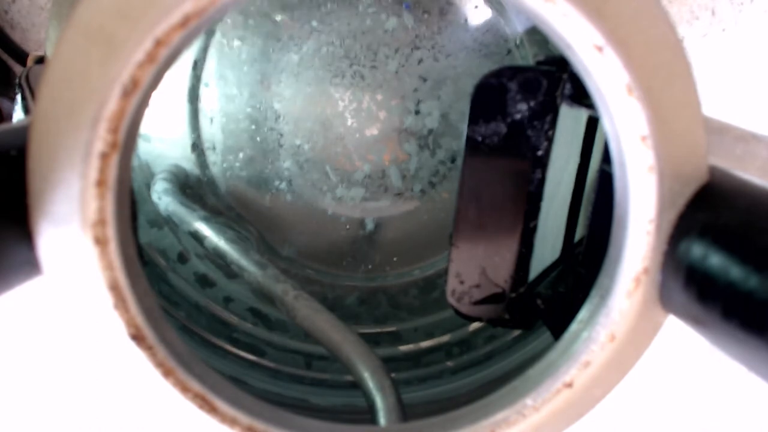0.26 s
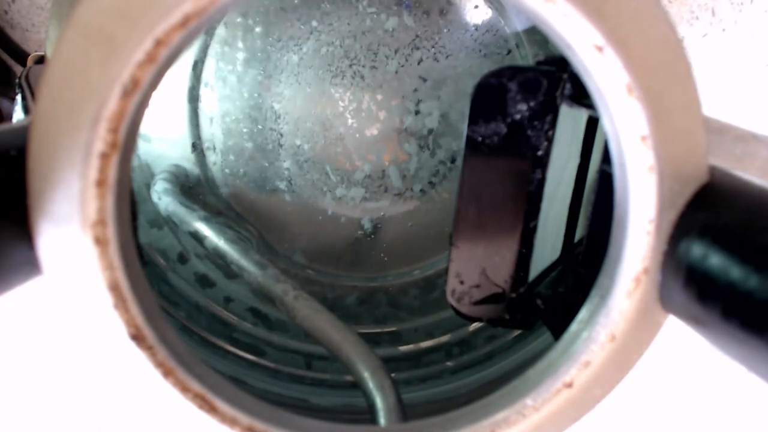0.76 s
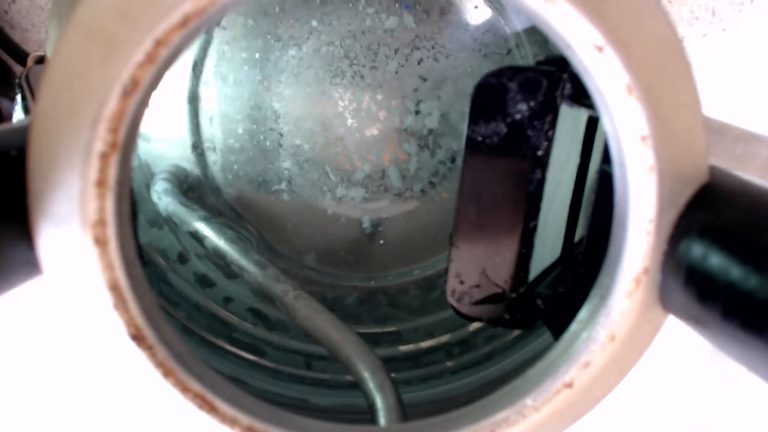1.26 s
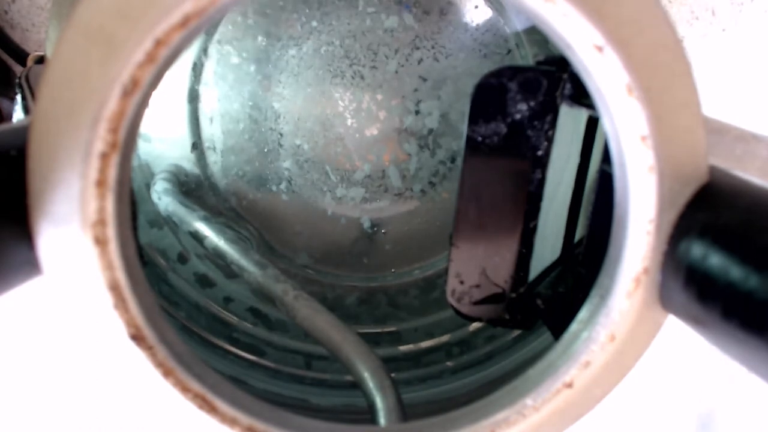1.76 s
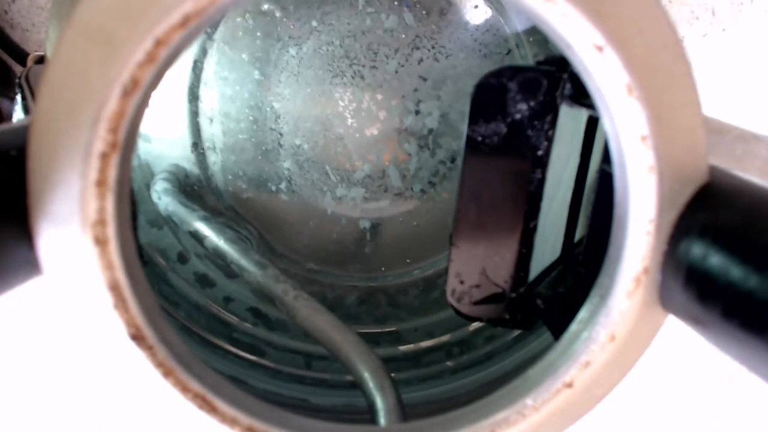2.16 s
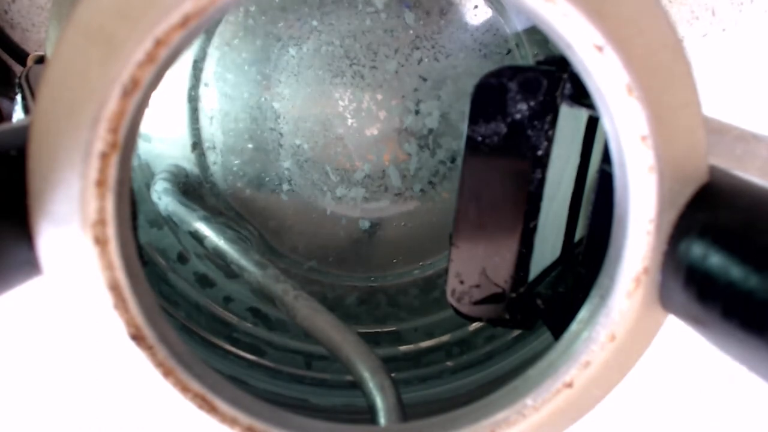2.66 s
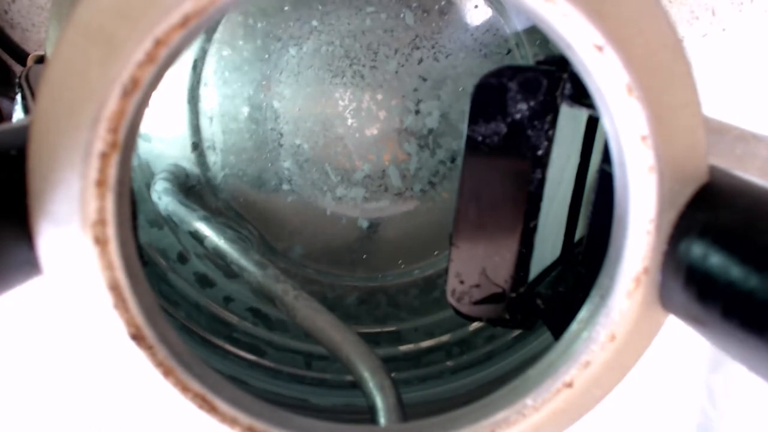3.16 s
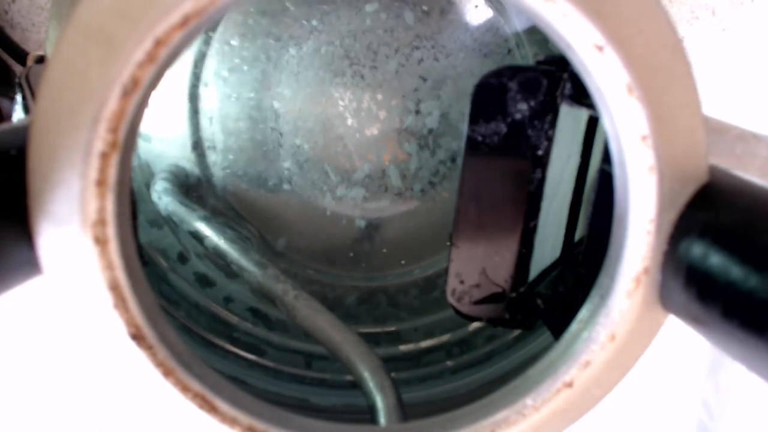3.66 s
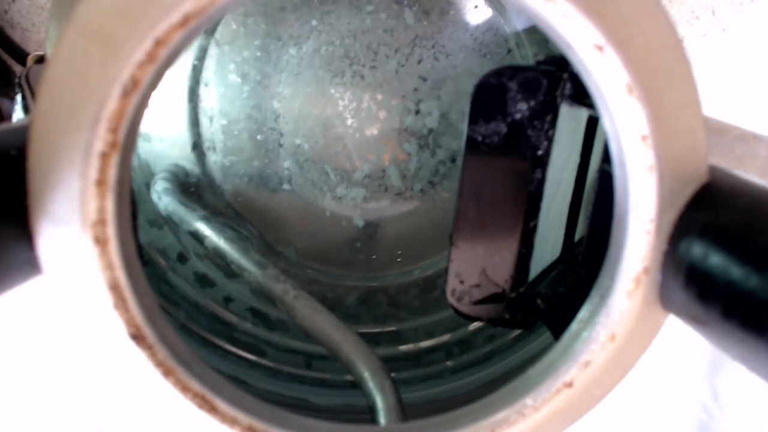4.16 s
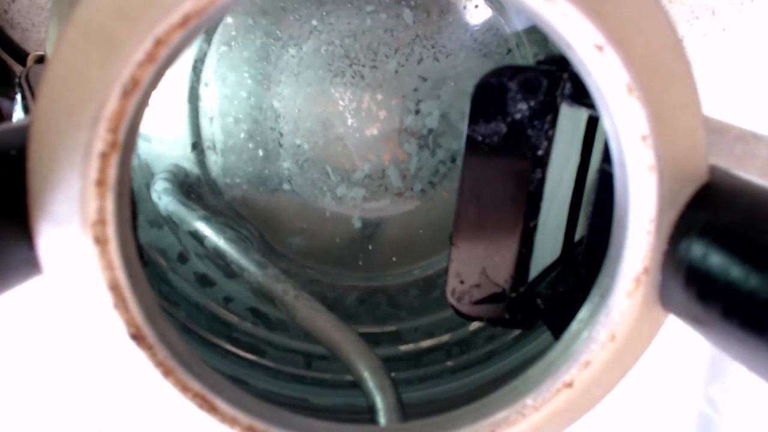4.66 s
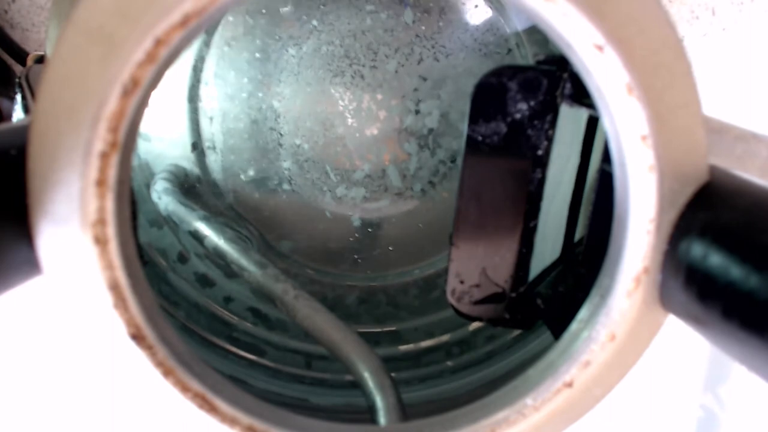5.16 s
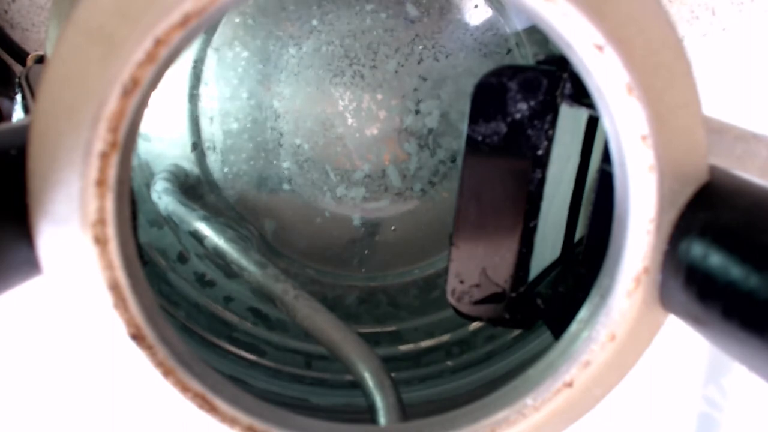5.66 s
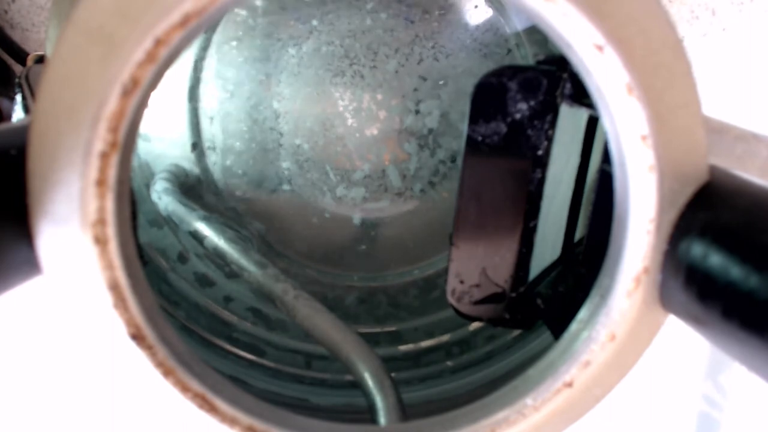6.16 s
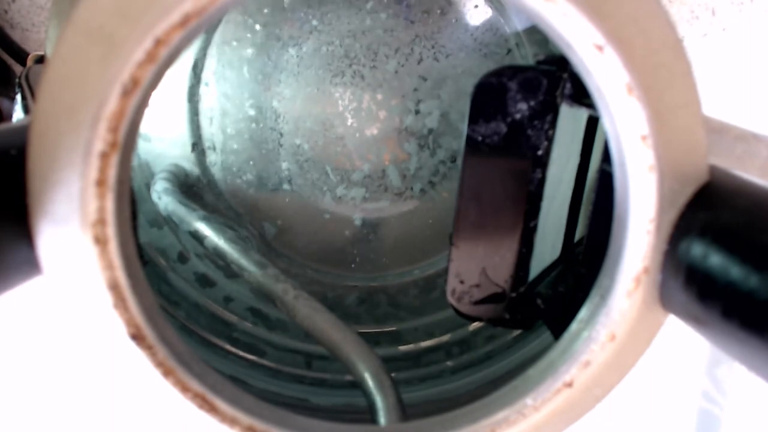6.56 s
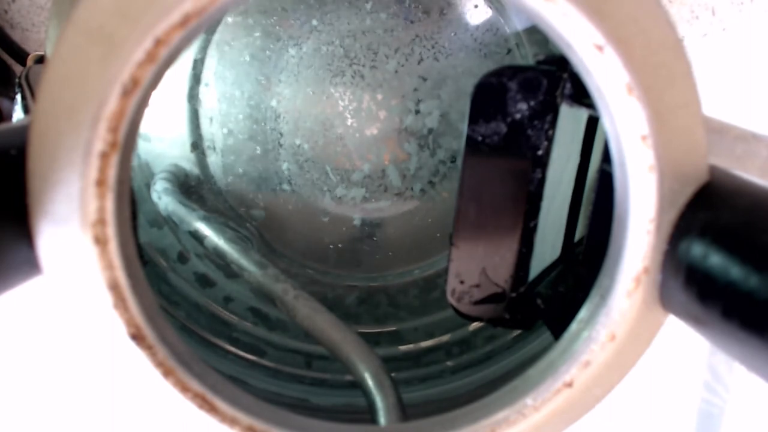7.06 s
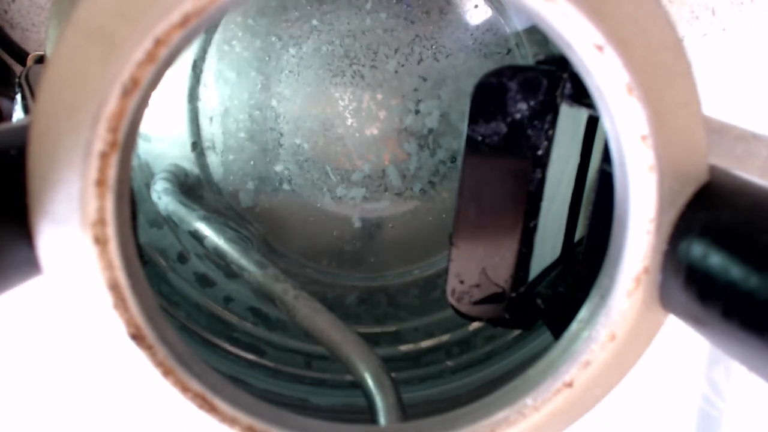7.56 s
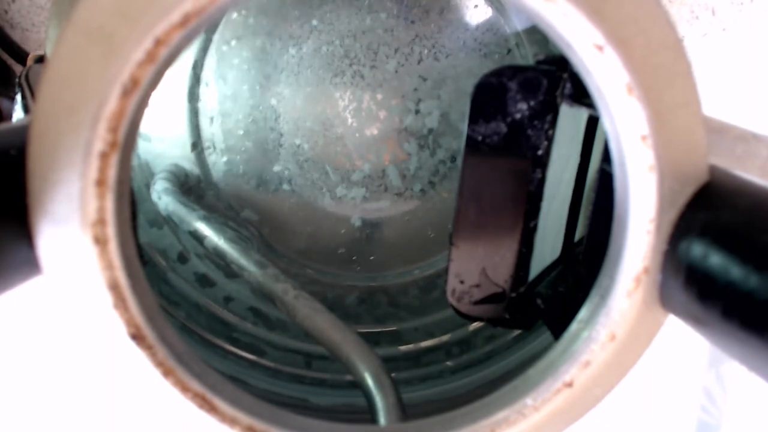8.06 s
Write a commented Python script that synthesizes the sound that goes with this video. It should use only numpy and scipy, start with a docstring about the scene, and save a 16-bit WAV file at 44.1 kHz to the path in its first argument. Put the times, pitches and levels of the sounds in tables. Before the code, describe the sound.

Water simmers in an electric kettle with its lid off, close to the microphone indoors. Quick, irregular blips and knocks ring briefly in the kettle's body, sometimes bunching together with a soft low thump. Smaller bubbles burble underneath and the tiniest merge into a steady sizzle, while a barely audible low hum and rumble sit beneath it all.

```python
"""Vapour bubbles swell and collapse on the element of an open electric kettle, heard just above the rim.
Each pulses for a few cycles and is loudest where the kettle resonates; the largest thump and heave.
Beneath them smaller bubbles simmer, and countless tiny collapses ring the upper modes as a steady fizz.
The worktop, shaken by the bubbling, rumbles faintly beside a low hum."""
import sys
import numpy as np
from scipy import signal
from scipy.fft import rfft, irfft, next_fast_len
from scipy.io import wavfile
from scipy.ndimage import uniform_filter1d, map_coordinates

SR = 44100
rng = np.random.default_rng(int(sys.argv[2]) if len(sys.argv) > 2 else 0)


def master(y):
    """Save y as 16-bit WAV."""
    cut = np.clip(np.atleast_2d(y).T, -1, 1)
    pcm = np.round(cut * 32767)  # scale
    wavfile.write(sys.argv[1], SR, pcm.astype(np.int16))


N = 367353

# spectrum of the worktop's rumble: (frequency [Hz], relative level [dB])
RUMBLE_SPECTRUM = [(15, -20), (65, -12), (97, -11), (150, 0.5), (200, -39), (330, -120)]
# spectrum of the fizz between the wall modes: (frequency [Hz], relative level [dB])
FIZZ_SPECTRUM = [(250, -60), (1400, -12), (1700, -14.5), (2200, -53), (4000, -26), (5200, -15.5),
                 (7000, -37), (9000, -28.5), (10500, -23.5), (11400, -33), (12100, -40)]
# upper modes of the wall: (frequency [Hz], bandwidth [Hz], gain [dB])
WALL_MODES = [(1860, 70, -11), (2140, 50, -3), (2320, 400, -4), (2365, 80, 0), (2890, 600, -5),
              (3210, 290, -5), (3520, 390, -6), (3820, 150, -6), (4170, 330, -8), (4560, 60, -5),
              (4600, 440, -9), (4655, 70, -7), (5040, 140, -14), (5460, 220, -12), (5680, 100, -13),
              (5840, 120, -17), (6030, 160, -17), (6410, 200, -11.5), (6850, 460, -17), (7210, 180, -21),
              (7480, 230, -16), (7830, 400, -20), (8390, 600, -20), (9410, 150, -19), (9610, 200, -23),
              (9980, 370, -25), (10490, 90, -30)]
# low modes of kettle and water: (frequency [Hz], bandwidth [Hz], gain [dB])
BODY_MODES = [(229, 62, -16.5), (306, 38, -2), (355, 41, -2), (458, 60, -4), (536.2, 21.3, -2),
              (618, 30, -10), (771, 36, -2), (852, 36, 2), (1006, 52, 1), (1220, 180, -14),
              (1329, 40.5, -6.5), (1462, 55, -9.5), (1566, 46, -20), (1626, 25, -14)]
# pushes of the hardest collapses on the whole kettle: (time [s], level [dB])
HEAVE_EVENTS = [(2.517, -52), (2.681, -55), (3.128, -54), (3.529, -44), (7.537, -50)]
# dull thumps of the largest collapses: (time [s], source level [dB])
THUMP_EVENTS = [(0.661, -38), (1.063, -42), (1.103, -31), (1.258, -33), (1.315, -39), (2.681, -33),
                (2.818, -38), (3.129, -37), (3.53, -41), (3.554, -35), (4.071, -41), (4.185, -43),
                (4.552, -40), (4.766, -32), (6.282, -32), (6.575, -37), (6.982, -35), (7.537, -42),
                (7.619, -43), (8.17, -36), (8.318, -40)]
# the clearest bubbles: (time [s], frequency [Hz], source level [dB], life [ms])
CLEAR_BUBBLES = [(0.127, 286, -14.5, 7.4), (0.232, 350, -20, 12), (0.236, 847, -18, 9.3),
                 (0.241, 1010, -23, 9.7), (0.306, 318, -17.5, 6), (0.321, 338, -21.5, 5.2),
                 (0.327, 510, -22, 9.5), (0.378, 830, -14.5, 6.1), (0.384, 1003, -12.5, 14),
                 (0.422, 806, -20, 5.6), (0.436, 352, -18.5, 6.6), (0.447, 836, -22, 9.8),
                 (0.5, 832, -11, 12.7), (0.503, 359, -18, 14), (0.662, 848, -16.5, 12.5),
                 (0.664, 350, -14.5, 6.4), (0.703, 1435, -28, 12), (0.735, 338, -17.5, 7.3),
                 (0.763, 830, -17.5, 7.3), (0.766, 524, -22.5, 13), (0.896, 985, -27, 17),
                 (0.894, 820, -13.5, 7.4), (1.043, 312, -17.5, 8.9), (1.053, 310, -20, 11),
                 (1.094, 835, -22, 6.6), (1.103, 309, -19, 20), (1.111, 990, -16, 5.4),
                 (1.143, 1020, -20.5, 8.4), (1.243, 780, -20.5, 11), (1.254, 300, -15, 16),
                 (1.265, 445, -12, 5.1), (1.306, 846, -18, 10), (1.307, 360, -16.5, 8.3),
                 (1.331, 837, -8.5, 8.1), (1.332, 995, -12, 13), (1.387, 334, -22, 8.2),
                 (1.429, 1014, -23, 12), (1.486, 852, -17.5, 19), (1.509, 299, -20, 25),
                 (1.523, 1007, -21, 9.4), (1.578, 352, -22.5, 18), (1.624, 2270, -30, 5.5),
                 (1.629, 2650, -34, 5), (1.754, 800, -15, 5), (1.769, 833, -13, 13), (1.796, 302, -14, 5),
                 (1.892, 543, -20, 11.5), (1.904, 860, -21.5, 13), (1.92, 336, -10.5, 10.5),
                 (1.938, 370, -14, 11), (1.97, 365, -10, 11.5), (1.983, 358, -12.5, 19),
                 (2.133, 494, -21, 7.8), (2.15, 352, -14, 7.3), (2.184, 350, -14.5, 5.8),
                 (2.186, 1010, -13.5, 10), (2.272, 536, -18.5, 5.7), (2.376, 816, -18, 8.9),
                 (2.402, 846, -15, 15), (2.404, 1420, -24, 10), (2.413, 367, -15, 3.2),
                 (2.481, 1020, -24, 9), (2.508, 486, -13.5, 5.4), (2.516, 478, -9.5, 3.9),
                 (2.516, 1600, -31, 1.5), (2.518, 1030, -18.5, 6.4), (2.521, 842, -10.5, 7.5),
                 (2.543, 332, -13, 7.6), (2.558, 834, -15, 7.6), (2.559, 1036, -24, 9.9),
                 (2.573, 820, -23, 8.1), (2.574, 1018, -19.5, 23), (2.601, 1020, -18.5, 19),
                 (2.671, 320, -13, 5), (2.682, 480, -20, 6.8), (2.683, 302, -13.5, 11),
                 (2.764, 536, -21, 7.8), (2.764, 846, -20, 21), (2.802, 840, -20.5, 5.4),
                 (2.892, 284, -19, 6.6), (2.901, 856, -19, 18), (2.906, 310, -18, 8.2),
                 (2.906, 1024, -12, 17), (2.924, 1020, -18, 7.9), (2.954, 840, -22.5, 21),
                 (3.047, 840, -23, 7.1), (3.088, 1000, -20, 9.4), (3.12, 1054, -13, 7),
                 (3.124, 319, -11, 10), (3.191, 338, -22, 9.2), (3.256, 833, -22.5, 6.3),
                 (3.351, 366, -18.5, 5.7), (3.376, 315, -18.5, 7.9), (3.429, 459, -23.5, 36),
                 (3.437, 359, -19, 19), (3.524, 350, -5, 3.6), (3.557, 288, -17.5, 20),
                 (3.732, 847, -16, 7.6), (3.836, 834, -19.5, 14), (3.841, 326, -23, 13),
                 (3.976, 483, -23, 13), (3.981, 343, -18, 8.3), (3.995, 860, -19, 8.4),
                 (4.013, 800, -18.5, 10.5), (4.031, 810, -10.5, 8.7), (4.09, 1020, -17.5, 12),
                 (4.144, 825, -14.5, 6.5), (4.164, 840, -11, 7.4), (4.18, 1025, -20, 7.7),
                 (4.236, 327, -16, 10), (4.36, 838, -14.5, 9.6), (4.445, 849, -13, 8.5),
                 (4.538, 1010, -21, 11), (4.546, 313, -24, 12), (4.695, 814, -20, 6.9),
                 (4.78, 1016, -20.5, 11), (4.813, 260, -16.5, 5.2), (4.952, 860, -21.5, 7.5),
                 (4.956, 325, -21, 7.9), (5.092, 344, -23.5, 38), (5.117, 794, -18, 10),
                 (5.316, 348, -17, 4.5), (5.337, 995, -19.5, 9.1), (5.416, 835, -18, 5),
                 (5.457, 811, -22.5, 8), (5.671, 496, -21, 9.7), (5.687, 364, -23.5, 9.3),
                 (5.824, 820, -18.5, 10), (5.998, 860, -22, 6.5), (6.043, 845, -20.5, 12),
                 (6.047, 530, -21, 9.2), (6.116, 520, -19, 7.2), (6.134, 530, -17, 13),
                 (6.148, 830, -18.5, 8.8), (6.166, 344, -20, 9.1), (6.201, 346, -14, 11.6),
                 (6.259, 312, -17.5, 10), (6.281, 276, -18, 14), (6.296, 327, -18.5, 13),
                 (6.49, 867, -14, 15), (6.491, 420, -22.5, 11), (6.575, 312, -22, 15),
                 (6.848, 1010, -18, 17), (6.928, 990, -23, 9.2), (6.985, 314, -9, 18.3),
                 (7.062, 500, -21, 8.5), (7.12, 825, -20.5, 7.2), (7.121, 318, -15.5, 5.4),
                 (7.154, 305, -21, 22), (7.498, 830, -21, 16), (7.537, 826, -12.5, 5),
                 (7.539, 297, -15.5, 9.9), (7.54, 460, -17.5, 10), (7.553, 486, -21, 8),
                 (7.538, 1710, -22, 0.81), (7.615, 373, -13.5, 5.8), (7.625, 328, -26, 5.5),
                 (7.659, 530, -19, 10), (7.671, 300, -18, 6.2), (7.718, 805, -17, 10.5),
                 (7.775, 830, -20, 9), (7.826, 467, -19.5, 11.5), (7.831, 350, -23, 10),
                 (7.923, 293, -19, 11), (7.925, 856, -19.5, 7.2), (7.992, 840, -16.5, 11),
                 (7.996, 323, -11, 5.2), (8.05, 282, -17, 4.3), (8.104, 826, -13.5, 5.9),
                 (8.114, 1040, -24, 7.5), (8.141, 344, -19.5, 13.0), (8.162, 850, -18.5, 7.1),
                 (8.189, 385, -22.5, 13), (8.289, 794, -21, 11), (8.314, 402, -16, 7.4)]


def amp(db):
    """Amplitude ratio of a level in decibels."""
    return 10 ** (np.asarray(db) / 20)


def unit_rms(x):
    """Normalisation to unit mean power."""
    return x / np.sqrt(np.mean(x ** 2) + 1e-20)


def filtered(x, response):
    """Linear filtering: the spectrum is multiplied by a frequency response."""
    size = next_fast_len(N + SR // 2)
    return irfft(rfft(x, size) * response(np.fft.rfftfreq(size, 1 / SR)), size)[..., :N]


def spectral_envelope(points):
    """Response interpolated between (Hz, dB) points on a logarithmic frequency axis."""
    hz, db = np.transpose(points)
    return lambda f: amp(np.interp(np.log(f + 1), np.log(hz + 1), db))


def resonances(modes):
    """Modal superposition: damped resonators add, with neighbours opposite in sign."""
    return lambda f: sum((-1) ** k * amp(db) * 1j * f * width / (hz * hz - f * f + 1j * f * width)
                         for k, (hz, width, db) in enumerate(modes))


def radiation(f, corner_hz=210):
    """Radiation efficiency: the open kettle gives off little bass."""
    return 1 / (1 + (corner_hz / (f + 1)) ** 4)


def body_response(f):
    """Transfer through the low modes of kettle and water, weighted by radiation."""
    return resonances(BODY_MODES)(f) * np.sqrt(radiation(f))


def wobble(knots_per_s):
    """Smooth random modulation: a spline through Gaussian values."""
    return map_coordinates(rng.standard_normal(int(N * knots_per_s / SR) + 4),
                           [np.arange(N) * knots_per_s / SR])


def pulsations(times, hz, db, life_ms, glide, reach=1600):
    """Bubble oscillation: each tone swells and dies, gliding as its bubble changes size."""
    offsets = np.arange(-reach, reach)  # samples about each peak
    t = offsets / SR
    times, hz, db, life = (np.asarray(v)[:, None] for v in (times, hz, db, life_ms / 1000))
    phase, bend = np.hsplit(rng.random((len(times), 2)), 2)
    swell = 2.0 ** (-np.abs(2 * t / life) ** 1.5)  # life is the width at half amplitude
    slide = glide * (2 * bend - 1)
    tone = np.sin(2 * np.pi * (phase + hz * t * (1 + slide * t / life / 2)))
    index = np.clip(np.round(times * SR).astype(int) + offsets + reach, 0, N + 2 * reach)
    padded = np.bincount(index.ravel(), (amp(db) * swell * tone).ravel(), N + 2 * reach + 1)
    return padded[reach:reach + N]


def worktop_rumble(kettle, rumble_db=-66, hum_db=-55.5):
    """Forced vibration: the worktop shakes as hard as the kettle bubbles, beside a narrow-band hum."""
    shaking = rng.standard_normal(N) * uniform_filter1d(np.abs(kettle), size=900) ** 1.3
    rumble = filtered(shaking, spectral_envelope(RUMBLE_SPECTRUM))
    hum_band = resonances([(178, 13, 0)])
    hum = filtered(rng.standard_normal(N), lambda f: hum_band(f) ** 2)
    return amp(rumble_db) * unit_rms(rumble) + amp(hum_db) * unit_rms(hum)


def wall_power(f):
    """Incoherent sources add in power; each mode acts twice, in the water and in the air above."""
    return sum(amp(db) ** 2 * np.abs(resonances([(hz, width, 0)])(f)) ** 4
               for hz, width, db in WALL_MODES)


def fizz(start_db=-39.5, fade_db_per_s=0.1, patch_db=1.1, collapses_per_s=20000):
    """Shot noise: tiny collapses merge into a hiss that excites the wall modes."""
    ticks = (rng.random(N) < collapses_per_s / SR) * rng.standard_normal(N)
    spectra = signal.stft(ticks, nperseg=512)[2]
    patches = uniform_filter1d(rng.standard_normal(spectra.shape), size=5, axis=0)  # across frequency
    patches = uniform_filter1d(patches, size=5, axis=1)  # across time
    hiss = signal.istft(spectra * amp(patch_db * unit_rms(patches)), nperseg=512)[1][:N]
    hiss = hiss * amp(.3 * wobble(9))
    broad = spectral_envelope(FIZZ_SPECTRUM)
    ringing = filtered(hiss, lambda f: np.sqrt(broad(f) ** 2 + wall_power(f)))
    level_db = start_db - fade_db_per_s * np.arange(N) / SR  # eases as the water warms
    return amp(level_db) * unit_rms(ringing)


def simmer(level_db=-31.5, count=2100, low_hz=160, high_hz=1300):
    """Resonant filtering: the low modes colour many brief bubbles and a wash of distant ones."""
    when, pitch, strength, length = rng.random((count, 4)).T
    hz = low_hz * (high_hz / low_hz) ** pitch
    db = np.minimum(-4.5 * np.log(1 - strength), 6.5)  # exponential spread of levels, capped
    cycles = 1.6 + 3.5 * length
    bubbles = pulsations(when * N / SR, hz, db, 1000 * cycles / hz, glide=.15, reach=700)
    bubbles = unit_rms(filtered(bubbles, body_response))
    wash = rng.standard_normal(N) * amp(1.8 * wobble(18))
    wash = unit_rms(filtered(wash, lambda f: body_response(f) * radiation(f)))
    return amp(level_db) * unit_rms(bubbles + amp(-1.0) * wash)


def heaves(corner_hz=95):
    """Impulsive forcing: each of the hardest collapses gives the kettle one deep, one-sided push."""
    times, db = np.transpose(HEAVE_EVENTS)
    impulses = np.bincount(np.round(times * SR).astype(int), amp(db), N)
    return filtered(impulses, lambda f: SR / (2 * corner_hz) / (1 + (f / corner_hz) ** 4))


def thumps(hz=176, life_ms=12):
    """Volume displacement: a large collapse shoves the water through a couple of slow cycles."""
    times, db = np.transpose(THUMP_EVENTS)
    shoves = pulsations(times, np.full_like(times, hz), db, np.full_like(times, life_ms), glide=0.092)
    return filtered(shoves, lambda f: radiation(f, corner_hz=82))


def clear_bubbles(roughness=0.22, knock_db=-12.5, max_life_ms=30):
    """Direct radiation and shock excitation: each bubble pulses unevenly and knocks the low modes."""
    times, hz, db, life_ms = np.transpose(CLEAR_BUBBLES)
    tones = pulsations(times, hz, db, np.minimum(life_ms, max_life_ms), glide=.08)
    shock = np.abs(tones) * rng.standard_normal(N)
    knock = filtered(shock, lambda f: body_response(f) / (1 + (f / 1500) ** 4))
    knock = unit_rms(knock) * np.std(tones)
    uneven = tones * (1 + roughness * wobble(450)) / np.hypot(1, roughness)
    return filtered(uneven, radiation) + amp(knock_db) * knock


def scene():
    """Superposition: the pressures from kettle and worktop add at one point."""
    kettle = clear_bubbles() + thumps() + heaves() + simmer() + fizz()
    return (kettle + worktop_rumble(kettle))[None]


def record(dry):
    """Band limiting: a steep low-pass removes the highest treble."""
    cutoff_hz = 11730
    return filtered(dry, lambda f: (f < cutoff_hz + 400) / (1 + (f / cutoff_hz) ** 60))


dry = scene()
out = record(dry)
master(out)
```